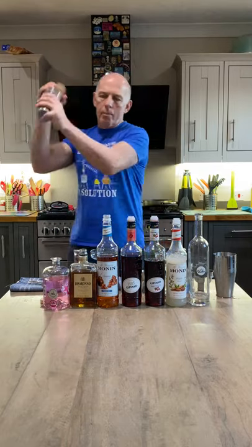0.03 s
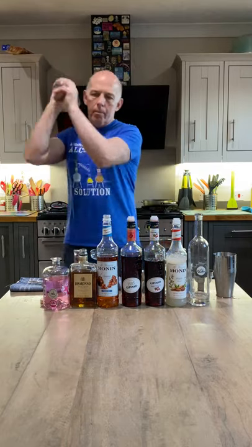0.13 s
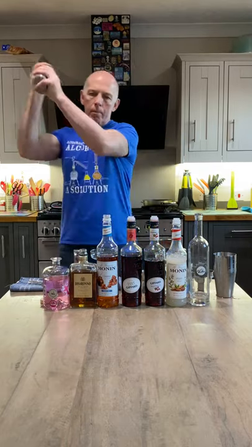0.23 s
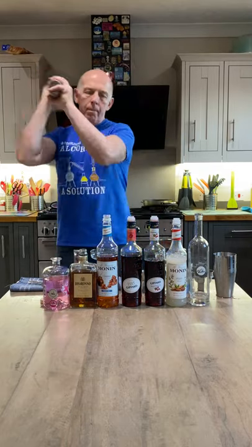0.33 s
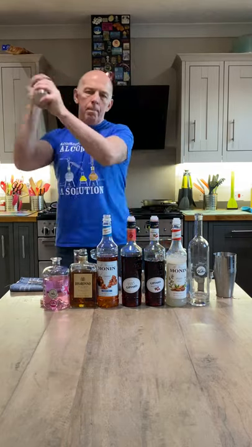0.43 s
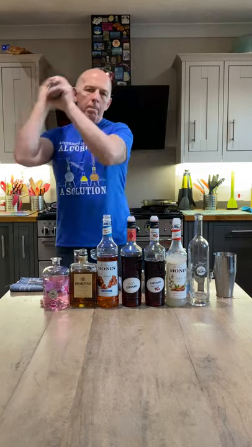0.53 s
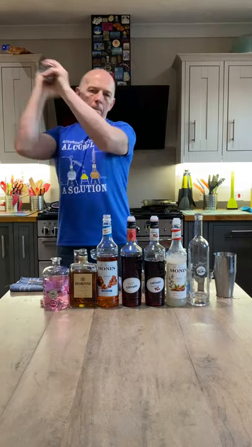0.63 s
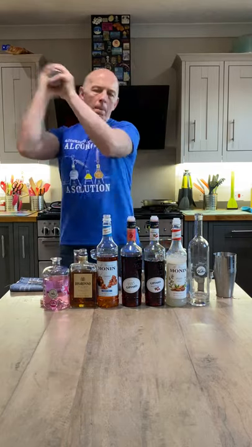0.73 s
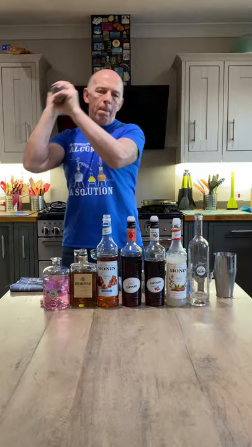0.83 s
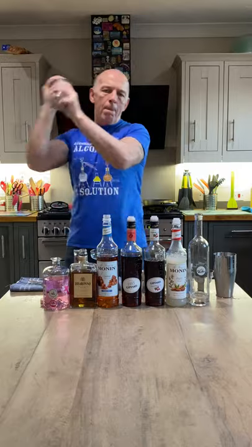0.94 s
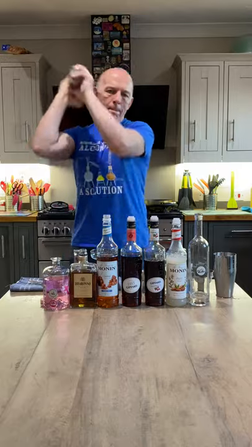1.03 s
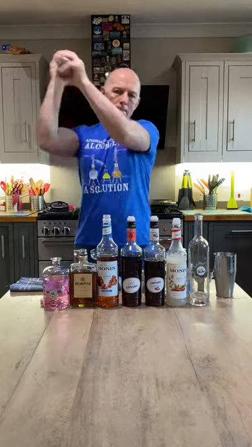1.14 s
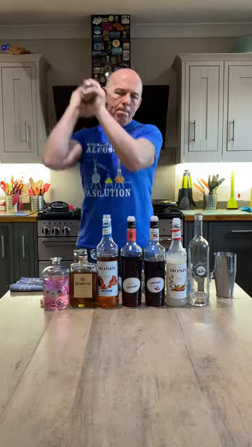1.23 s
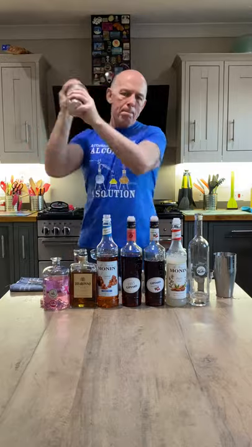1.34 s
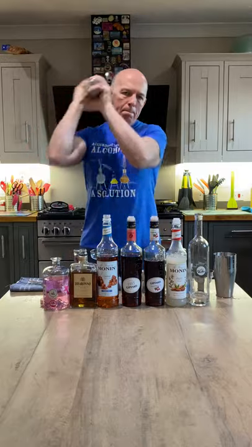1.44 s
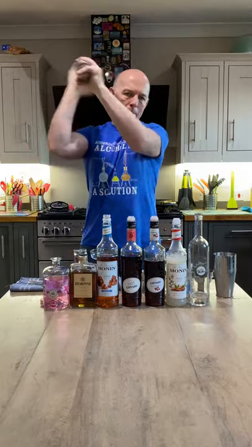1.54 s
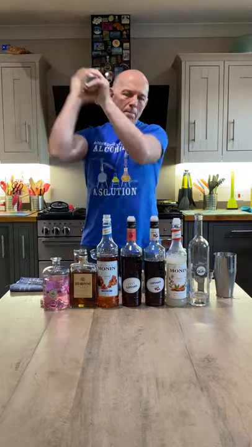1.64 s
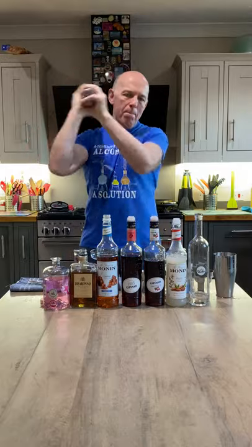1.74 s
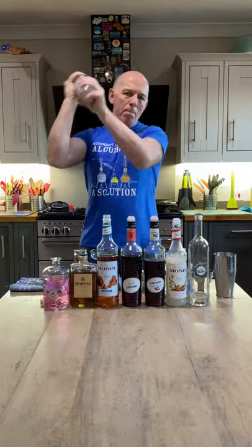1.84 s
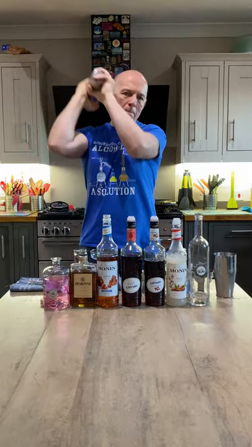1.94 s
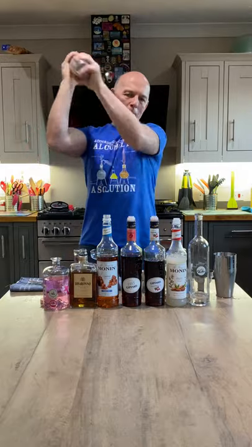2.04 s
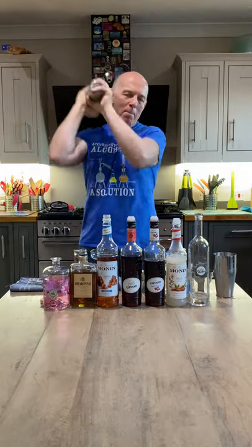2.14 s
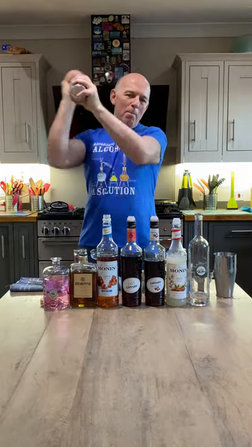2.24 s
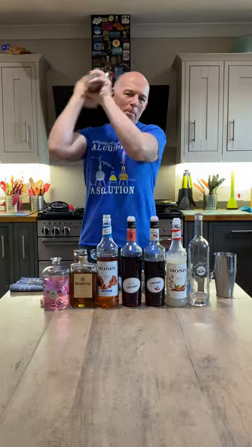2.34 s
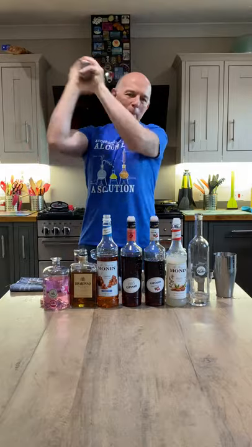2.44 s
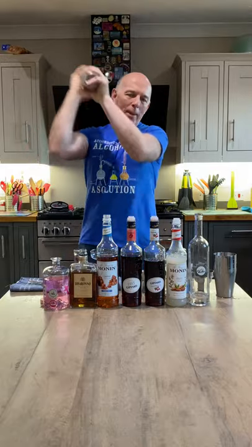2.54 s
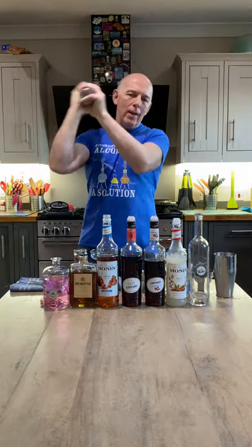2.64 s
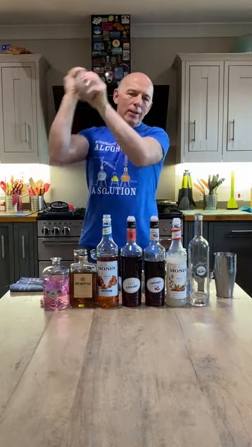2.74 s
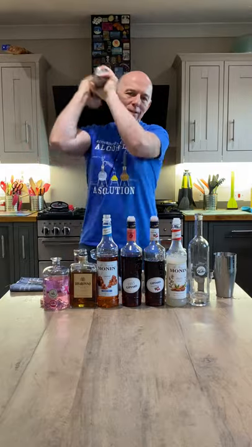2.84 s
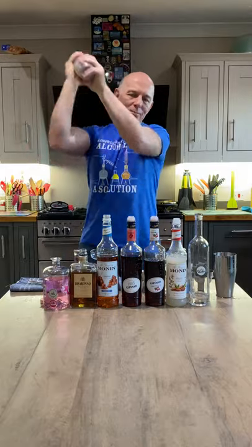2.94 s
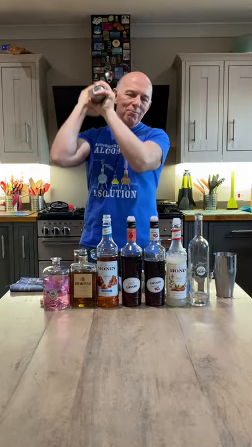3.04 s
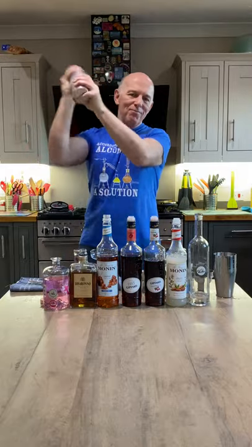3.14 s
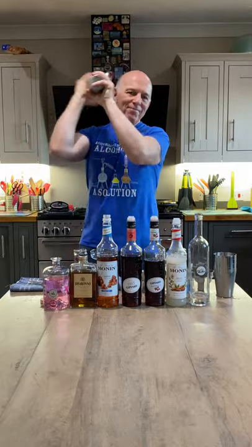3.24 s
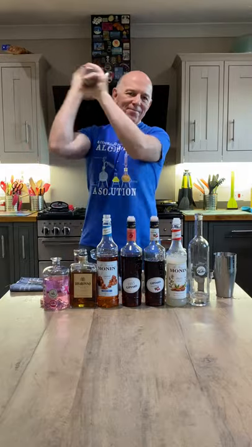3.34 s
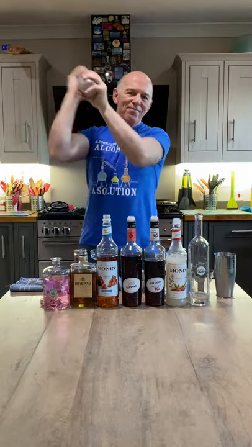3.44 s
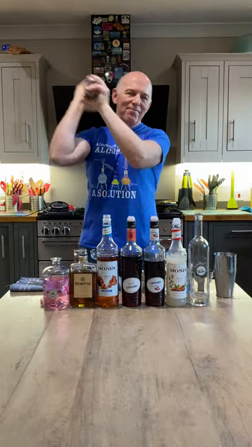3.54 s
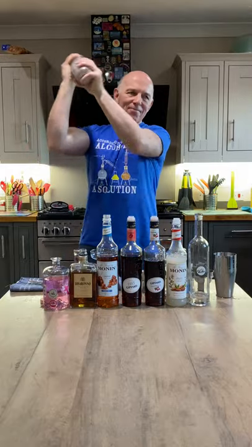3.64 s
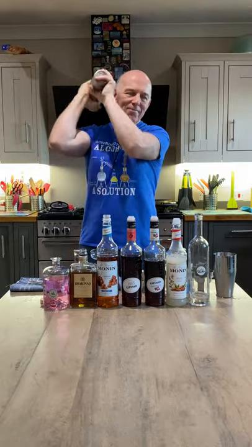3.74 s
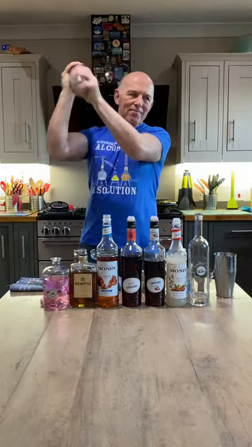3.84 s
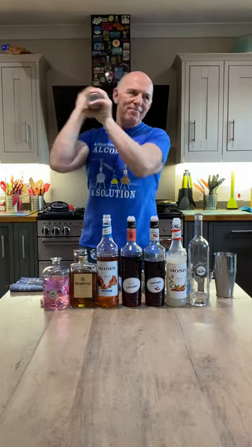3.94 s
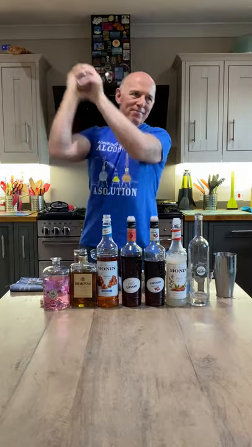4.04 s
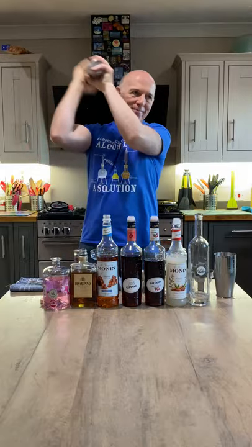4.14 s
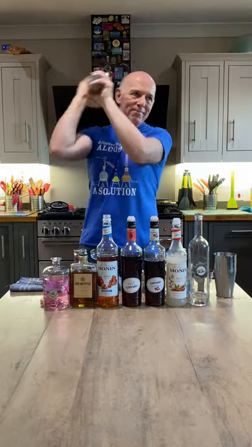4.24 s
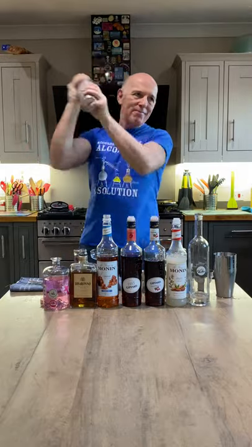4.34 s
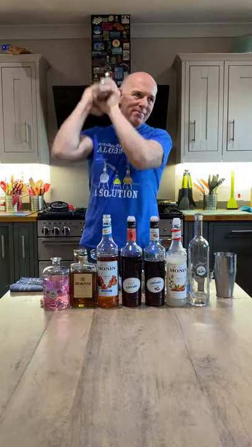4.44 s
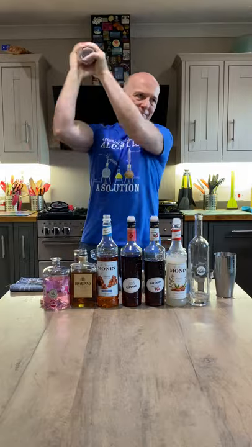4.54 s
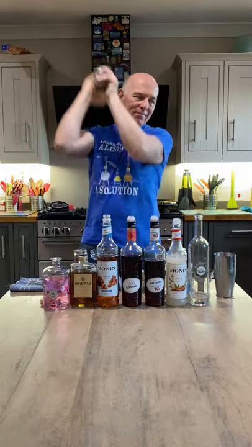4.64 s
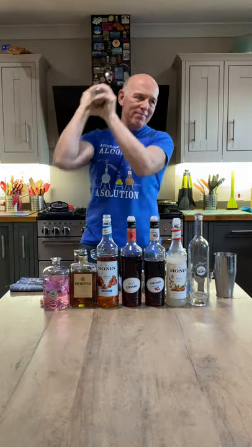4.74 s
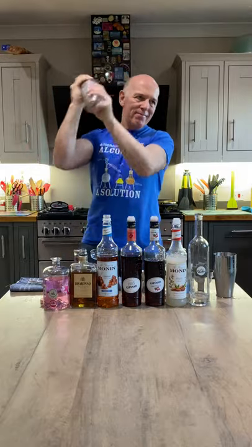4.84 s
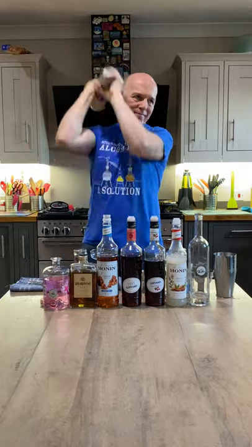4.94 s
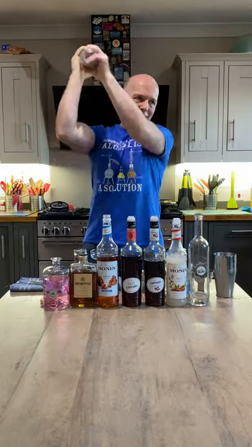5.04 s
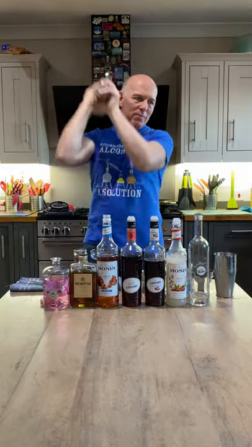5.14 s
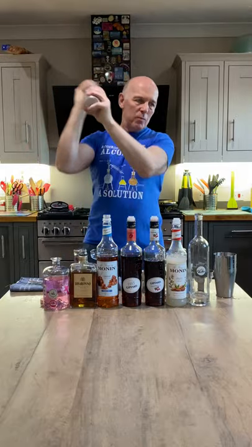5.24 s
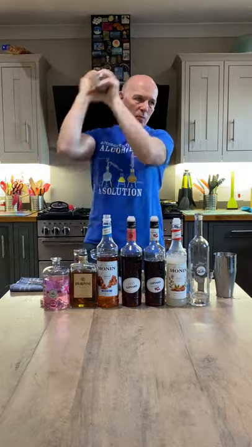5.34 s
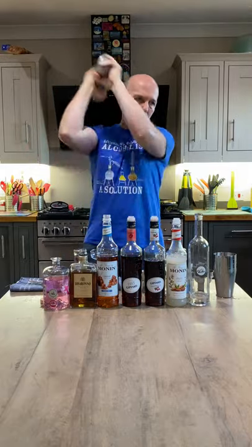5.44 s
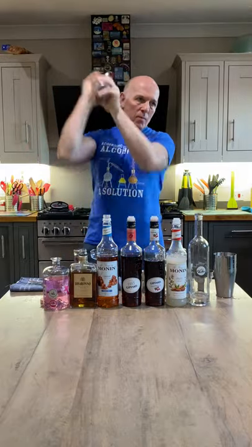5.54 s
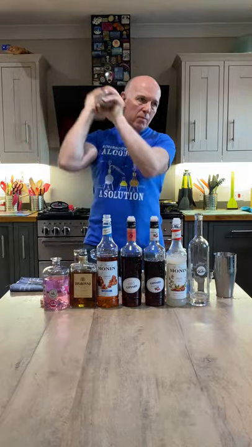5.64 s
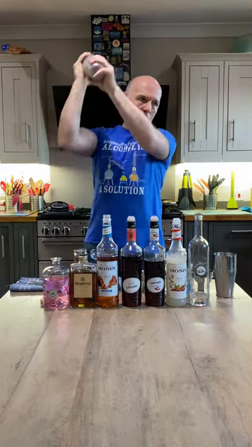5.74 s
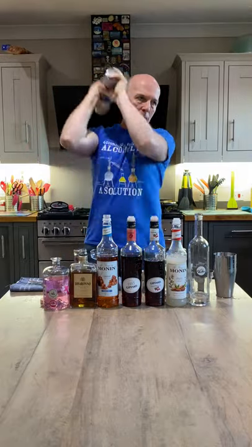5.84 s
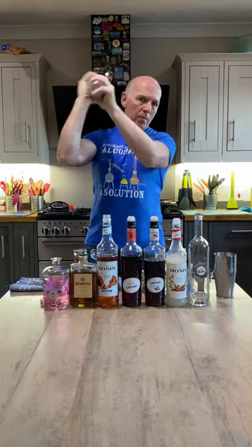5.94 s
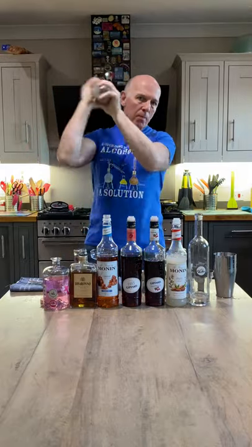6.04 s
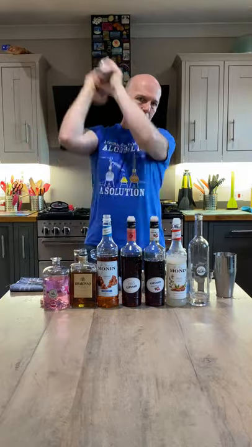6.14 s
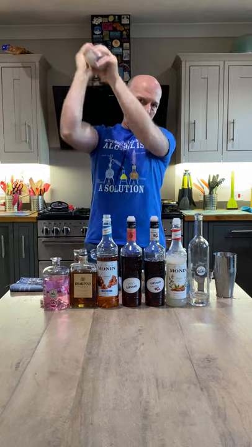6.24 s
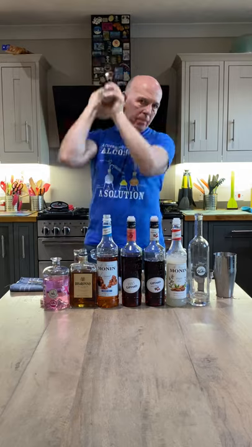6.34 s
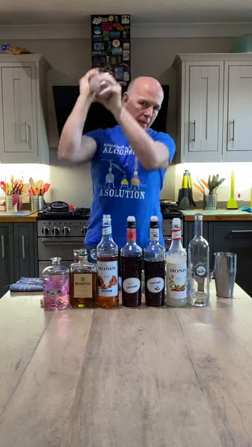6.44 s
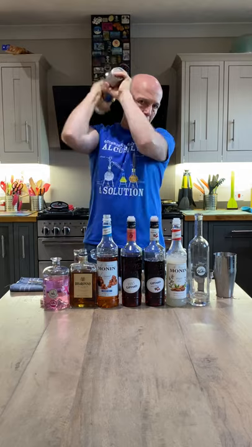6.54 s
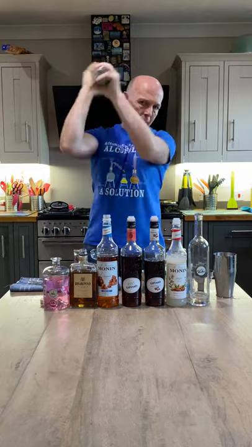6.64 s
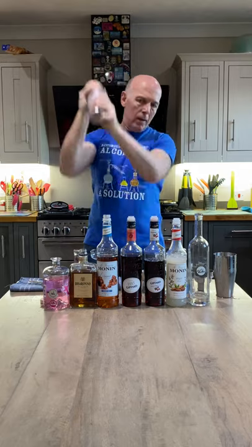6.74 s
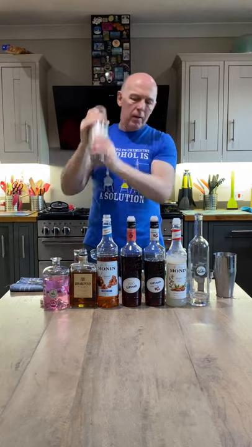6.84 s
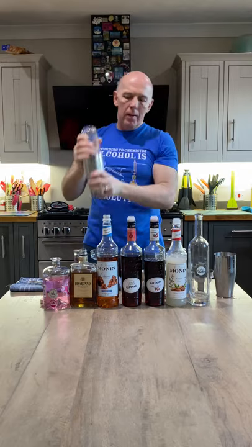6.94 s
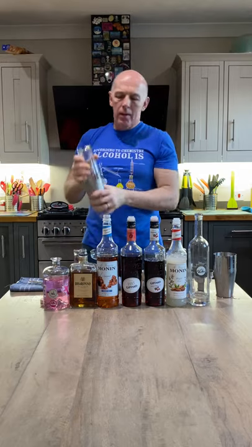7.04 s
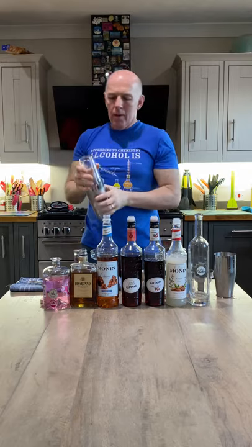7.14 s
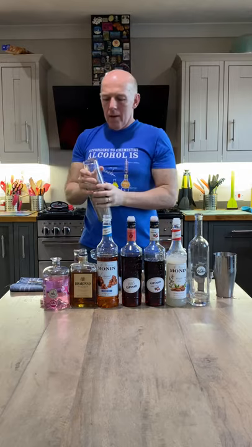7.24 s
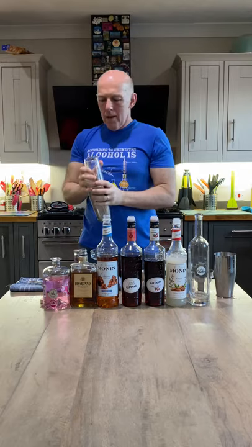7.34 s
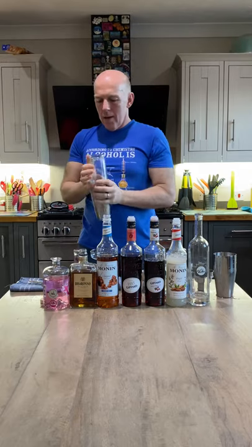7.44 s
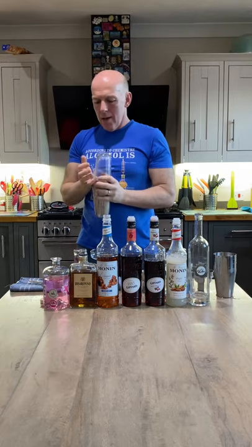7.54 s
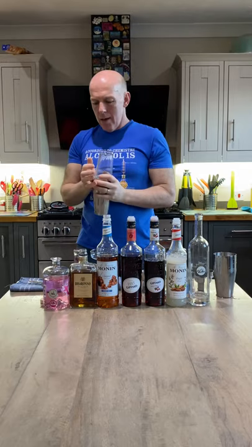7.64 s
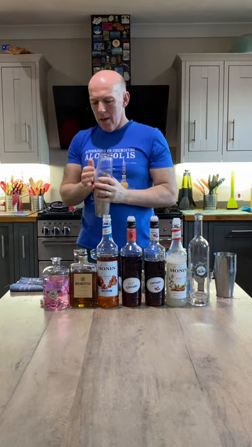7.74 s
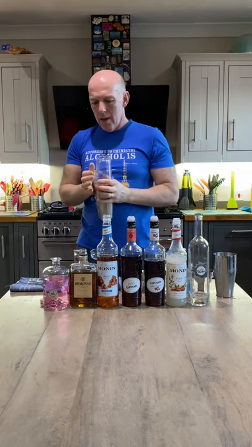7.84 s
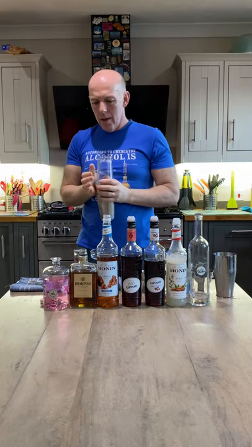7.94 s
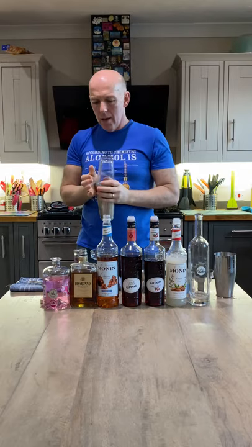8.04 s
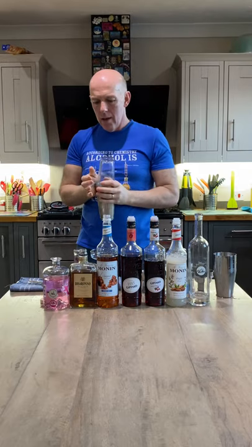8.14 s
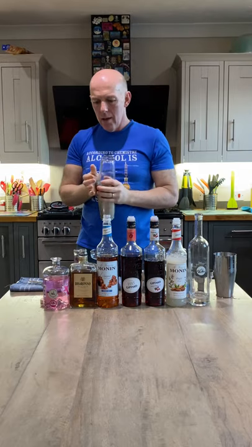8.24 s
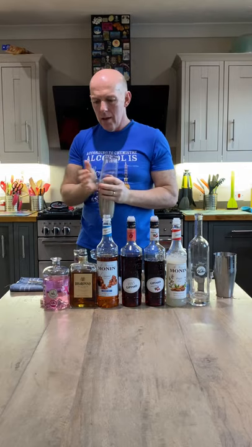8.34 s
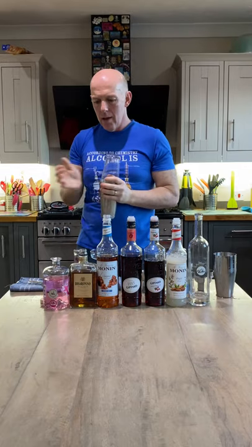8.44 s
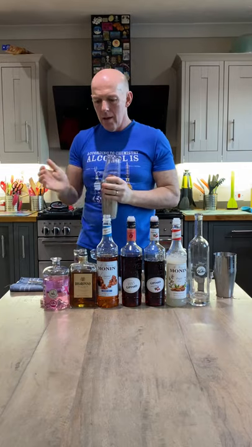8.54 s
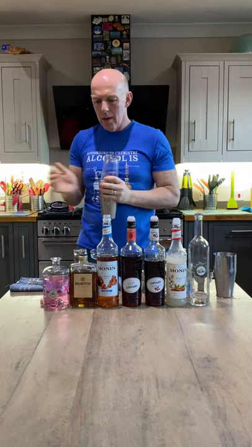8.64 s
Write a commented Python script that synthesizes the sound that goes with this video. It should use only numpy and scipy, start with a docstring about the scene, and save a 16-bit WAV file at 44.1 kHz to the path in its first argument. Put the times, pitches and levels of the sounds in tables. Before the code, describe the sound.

From 0 to about 6.7 seconds a steel cocktail shaker is shaken vigorously in a kitchen. Ice and liquid hit alternate ends roughly nine times a second, slightly uneven in timing and force. Each landing is a short swell of clattering, damped metallic ringing, mostly mid-high, with crisp icy spray above. Harder single cracks, brief singing chatter, dull hollow knocks and low liquid slams stand out irregularly, linked by softer sliding ice. The last weaker clacks fall around 6.8 to 7.1 seconds and the room echo dies away. From 7 to 8.6 seconds there is only a very faint rustle and draining slosh, with small sharp ticks of settling cubes, clearer near 7.5 and 7.9. At about 8.67 a palm slaps the tin with a low, hollow thump, cut off almost immediately. Stereo microphone across the counter, bright but rolled-off top, lively echoes, and faint low hum and rumble that sink after the shaking.

```python
"""In a kitchen, two close microphone ports hear a steel cocktail tin across a counter, with mains hum below.
From the start ice and liquid are thrown from end to end: random contacts ring the modes of wall and ends,
with timed blows, chatter, knocks and slams. Near 7 s the shaking stops: grains through sliding resonances
make a faint rustle and slosh, and the settling ice ticks. At the very end a palm slaps the tin."""
import sys
import numpy as np
from scipy import signal
from scipy.fft import rfft, irfft, next_fast_len
from scipy.io import wavfile

SR = 44100
rng = np.random.default_rng(int(sys.argv[2]) if len(sys.argv) > 2 else 0)


def to_wav(s):
    """Save 16-bit WAV."""
    ch = np.atleast_2d(s).T  # columns
    pcm = np.round(np.clip(ch, -1, 1) * 32767)  # PCM
    wavfile.write(sys.argv[1], SR, pcm.astype(np.int16))


N = 383135

# Source levels are relative: echoes and port colour come after them.
# Ice landing at one end of the tin, about nine times a second: peak_s, low_wall_db,
# then relative to low_wall_db: high_wall_db, chips_db, thud_db
LANDINGS = [(0.045, -27.5, 0, 12.5, 1), (0.208, -33, 2.5, 15, -1), (0.28, -30.5, -3.5, 14, 2.5),
            (0.393, -37.5, 0.5, 17.5, -9), (0.472, -30, -1, 12.5, 2), (0.632, -30.5, 3, 12.5, 1),
            (0.709, -30.5, -3.5, 9.5, 3.5), (0.796, -38, 4.5, 17.5, 4.5), (0.92, -35, 5.5, 17, 9.5),
            (1.048, -32.5, 1, 13, 1), (1.149, -29, -3.5, 9.5, 3), (1.273, -36.5, 7.5, 16, 8.5),
            (1.363, -32.5, 2.5, 16, 9.5), (1.491, -31.5, -2.5, 12, -1), (1.587, -31.5, 3.5, 13, 6.5),
            (1.707, -32.5, 2, 14, -2.5), (1.81, -33, 1, 16, 5), (1.954, -28, -0.5, 9, -7.5),
            (2.046, -34, 1, 15, 4), (2.162, -31, 0, 13, 4), (2.27, -31, 0, 9.5, 3.5),
            (2.398, -32, 1.5, 11.5, 4), (2.498, -31, 0, 12.5, 3.5), (2.613, -35, 0.5, 13.5, 4),
            (2.713, -31.5, -3, 12, 8.5), (2.836, -37.5, 6.5, 18, 8), (2.936, -30, 0.5, 10, 3.5),
            (3.027, -32.5, 1, 11, 1), (3.171, -28, -5, 10, 1), (3.305, -33, 2.5, 12.5, 5),
            (3.42, -31.5, 2.5, 16.5, 5.5), (3.533, -35.5, 1, 11.5, 2), (3.64, -31, 2.5, 14, 4),
            (3.749, -33, -0.5, 12, 5), (3.871, -30, 2.5, 13.5, 3.5), (3.995, -33, 1.5, 11, 5),
            (4.097, -30, -7, 9.5, -1.5), (4.195, -36, 1, 12, 8), (4.319, -29.5, 0.5, 11.5, 4.5),
            (4.452, -34, 3.5, 14, 3.5), (4.563, -32, -0.5, 14, 1), (4.669, -32, -3.5, 11, -1.5),
            (4.798, -33, 0.5, 9, 7.5), (4.881, -34, 2, 14, 8), (5.009, -34.5, 3.5, 18.5, -1),
            (5.146, -32, -6.5, 7.5, 5.5), (5.262, -32.5, 1, 15, 7), (5.385, -31.5, 2.5, 13.5, 1.5),
            (5.502, -30, 0, 12.5, 5.5), (5.639, -33, -3, 10, 0), (5.745, -31, -2, 12, 4),
            (5.85, -38, 6.5, 17, 12), (5.985, -30.5, 0.5, 15.5, 5.5), (6.119, -32.5, -3, 10, -1.5),
            (6.245, -32, 2, 14.5, 7), (6.352, -36, -2, 13, 8), (6.462, -34, 1.5, 12.5, 6.5),
            (6.578, -34.5, 4.5, 14.5, 6), (6.699, -29, -4, 10.5, -2), (6.767, -54.5, 14, -2, 0),
            (6.895, -44.5, 8, 12.5, 9)]
RISE_S, FALL_S, SLIDE_S = 0.0096, 0.026, 0.079   # times of the landing's power; the slide spreads both ways
# Damped wall modes of the gripped tin: mode_hz, level_db, t60_s
WALL_MODES = [(1350, -4, .02), (1660, -2, .015), (1790, 0, .015), (1920, 0, .015), (2080, 0, .018),
              (2250, 0, .016), (2450, -2, .015), (2750, 0, .016), (2920, 0, .016), (3120, -2, .014),
              (3500, 0, .015), (3700, -1, .013), (4000, -2, .012), (4400, -3, .011), (5400, -2, .009),
              (5850, -2, .009), (6800, -3, .008)]
# Low modes of the tin's ends: mode_hz, level_db, t60_s
END_MODES = [(546, 3.5, .04), (624, 5.5, 0.015), (788, 7.5, 0.051), (900, 0, 0.057), (973, 1.5, 0.02),
             (1100, 1.5, 0.049)]
# Single hard blows of a cube on the wall: start_s, level_db, pitch_hz (rings most), crack_db (over level_db)
BLOWS = [(0.034, -15, 5610, -8), (0.1787, -10, 2910, 1.5), (0.2094, -23, 1775, -10.5),
         (0.274, -1, 6780, -10.5), (0.4034, -18, 2920, -3), (0.441, -9, 2700, -6), (0.452, -20, 2900, -9.5),
         (0.4626, -21.5, 2880, -8), (0.61, -14, 3000, -4), (0.633, -12, 1830, -11),
         (0.653, -15.5, 1780, -14), (0.6, -22, 2330, -9.5), (0.703, -0.5, 1876, -6.5),
         (0.7724, -19, 2100, -14), (0.8829, -15, 2810, -4), (0.83, -8, 2880, -8), (0.9114, -6, 5270, -9),
         (1.014, -12.5, 2220, -4), (1.0505, -8, 2730, -7.5), (1.092, -7, 1770, -19),
         (1.137, -5, 3780, -5.5), (1.2511, -28, 1795, -4.5), (1.3317, -16.5, 2810, -15.5),
         (1.3563, -10, 2070, -3.5), (1.576, -7.5, 1746, 1), (1.593, -7.5, 1780, -4.5),
         (1.618, -23, 1910, -4), (1.6561, -7.5, 2440, -5), (1.6906, -8, 2100, -8), (1.8035, -17, 1860, 6.5),
         (1.932, -11, 1900, -2), (1.96, -16.5, 1730, -10.5), (2.0004, -5, 1920, -22.5),
         (2.046, -8, 2200, -13), (2.2144, -7, 2930, -10), (2.2563, -10, 1930, -11.5),
         (2.2682, -5.5, 2320, 5), (2.276, -13, 2400, -11.5), (2.3221, -11.5, 2310, -11.5),
         (2.393, -9, 2750, -8), (2.408, -11.5, 2730, -16), (2.5032, -13.5, 2640, -8.5),
         (2.7072, -14, 2120, -1), (2.7901, -9, 2180, -10), (2.841, -9.5, 1920, -12),
         (2.9301, 7, 1740, -13.5), (2.931, -15, 3650, -19), (2.937, -11, 1840, -14), (2.954, -10, 1940, -4),
         (2.983, -13, 1790, -10.5), (3.021, -14, 2110, -10), (3.1592, -19, 2210, -14),
         (3.364, -17.5, 1860, -11), (3.3924, -4, 3870, -1), (3.4086, -11, 5450, -10.5),
         (3.4417, -8.5, 2280, -14.5), (3.475, -2.5, 2100, -13), (3.626, -21, 2860, 6),
         (3.6406, -17, 3100, -7.5), (3.7638, -11.5, 2750, -10), (3.8467, -12, 2340, 0),
         (3.8801, -15, 2330, -14), (3.9038, -8, 2170, -12), (4.0992, -9.5, 1924, -9),
         (4.1789, -12.5, 1920, -5), (4.2118, -4, 2320, -10), (4.307, -19, 1990, -10),
         (4.3102, 0, 3470, -18), (4.329, 0.5, 3300, -3.5), (4.338, -11.5, 3500, -3.5),
         (4.345, -8, 2030, -19), (4.386, -13, 2300, 2.5), (4.4644, -7, 2520, -13.5),
         (4.5131, -7, 1800, -12.5), (4.557, -13.5, 3670, -15), (4.6034, -16, 3610, -10),
         (4.6423, -12, 2850, 0.5), (4.7745, -12, 2780, -12), (4.7895, -10, 2140, 5), (4.808, -1, 2190, -6),
         (4.833, -20, 2200, -12), (4.873, -6.5, 5400, -15), (4.939, -5.5, 3900, -7.5),
         (4.978, -11, 2000, -11), (5.012, -15, 3740, -12), (5.03, -16.5, 3700, -13), (5.046, -8, 2130, -16),
         (5.1494, -7.5, 2830, -4), (5.2448, -15, 2060, -2.5), (5.3317, -18, 2900, -11.5),
         (5.3453, -11, 2160, -3), (5.3797, -4.5, 2040, -11.5), (5.493, -6, 2010, -11),
         (5.6446, -13.5, 2720, -8.5), (5.7074, -24, 3660, -7.5), (5.7374, -20, 1886, -11.5),
         (5.7528, -9, 1980, -5), (5.8404, -5.5, 2190, -17), (5.9634, -6.5, 2170, 5),
         (5.98, -2.5, 3820, -18), (6.1764, -15.5, 2760, -7), (6.238, -7, 4100, -13.5),
         (6.3294, -4.5, 2190, -15), (6.4656, -7, 1880, -2), (6.537, -2, 3120, -5), (6.5934, -21, 2020, -6),
         (6.6906, -2, 1580, -10.5), (6.8753, -25, 2084, 6), (6.8923, -15, 3420, -3.5),
         (6.9092, -13.5, 3400, -4.5), (6.948, -21.5, 2090, -8), (7.08, -31, 1940, -17),
         (7.105, -36, 2180, -16)]
BOUNCE_S, BOUNCE_DB = 0.018, -13   # the first touch stands clear of its bounces
# A cube chattering on one spot, keeping one mode singing: start_s, length_s, level_db, pitch_hz
CHATTER = [(0.006, 0.045, -37.5, 3130), (0.006, 0.038, -40, 1680), (0.006, 0.097, -34.5, 2910.0),
           (0.026, 0.035, -29, 3790.0), (0.191, 0.036, -36, 3970), (0.196, 0.022, -27, 1810.0),
           (0.232, 0.06, -31, 3070), (0.395, 0.1, -31.5, 2850), (0.623, 0.045, -30.5, 1850),
           (0.694, 0.021, -24.5, 1886), (0.736, 0.047, -29, 2090), (0.849, 0.042, -35, 2740),
           (1.093, 0.09, -33, 1690), (1.126, 0.022, -28, 3680), (1.243, 0.029, -28, 1800),
           (1.323, 0.046, -30.5, 2760), (1.35, 0.046, -34, 2750), (1.446, 0.052, -30, 2030),
           (1.574, 0.024, -24.5, 1810), (1.798, 0.069, -38.5, 1920), (1.926, 0.092, -34.5, 1720),
           (1.99, 0.076, -32.5, 1880), (2.026, 0.028, -30.5, 2800), (2.039, 0.036, -29, 2200.0),
           (2.13, 0.054, -30, 2690), (2.206, 0.075, -41, 2950), (2.254, 0.025, -33.5, 3050),
           (2.261, 0.03, -32, 2350), (2.386, 0.032, -29.5, 2050), (2.393, 0.029, -28, 2780),
           (2.454, 0.046, -31.5, 1710), (2.695, 0.044, -33, 2110.0), (2.848, 0.068, -33, 2070),
           (2.922, 0.012, -20, 3570), (2.922, 0.017, -20.5, 1770), (2.957, 0.045, -39, 1770),
           (3.089, 0.079, -34, 2920), (3.158, 0.036, -34, 2240.0), (3.353, 0.025, -27.5, 1860),
           (3.406, 0.14, -34.5, 2060), (3.531, 0.024, -26, 2880), (3.564, 0.067, -31.5, 1940.0),
           (3.633, 0.041, -29.5, 3890), (3.634, 0.036, -32, 3120), (3.88, 0.052, -28, 2220.0),
           (4.038, 0.03, -28, 2890), (4.094, 0.05, -28, 1930), (4.301, 0.028, -21, 3570),
           (4.311, 0.04, -32, 2870), (4.314, 0.061, -29, 1940), (4.436, 0.1, -36, 1810.0),
           (4.449, 0.034, -30, 2350.0), (4.503, 0.034, -28, 1835), (4.529, 0.077, -31, 1650),
           (4.548, 0.025, -25, 3540), (4.573, 0.047, -29, 3650), (4.793, 0.038, -28, 2150),
           (4.906, 0.04, -29.5, 2050.0), (4.941, 0.12, -33, 3940.0), (4.948, 0.052, -27.5, 1890),
           (4.998, 0.069, -28, 3700), (5.037, 0.024, -25, 2120), (5.237, 0.037, -26.5, 2020),
           (5.336, 0.054, -30, 2930.0), (5.39, 0.034, -28, 1960.0), (5.741, 0.059, -33, 2030),
           (5.958, 0.061, -31, 3800), (5.966, 0.031, -32.5, 1770.0), (5.992, 0.11, -32.5, 2110.0),
           (6.166, 0.027, -27.5, 2800), (6.173, 0.058, -32.5, 1800), (6.526, 0.038, -30, 3110),
           (6.559, 0.024, -27, 4130.0), (6.574, 0.046, -29, 1990), (6.685, 0.052, -25, 1660)]
CHATTER_RISE_S, CHATTER_T60_S = 0.01, 0.03
# Dull knocks of ice on the ends: start_s, level_db, pitch_hz (rings most)
KNOCKS = [(0.042, -25, 1070), (0.275, -38, 940), (0.708, -23, 1100), (0.912, -17.5, 940), (1.017, -36, 931),
          (1.133, -34, 1050), (1.358, -35.5, 929), (1.577, -40, 988), (1.661, -29, 543), (1.808, -16, 870),
          (1.919, -26.5, 620), (2.05, -21.5, 930), (2.16, -32, 525), (2.272, -24.5, 560), (2.71, -21, 940),
          (2.834, -23.5, 549), (2.947, -25.5, 982), (3.174, -21, 900), (3.423, -26, 479), (3.641, -30, 982),
          (3.722, -25.5, 824), (3.889, -35, 896), (4.336, -29, 880), (4.43, -20, 607), (4.668, -22, 602),
          (4.798, -23.5, 930), (5.28, -18, 519), (5.353, -29, 620), (5.99, -23.5, 887), (6.234, -30, 767),
          (6.355, -29, 610), (6.475, -17, 940), (6.571, -28, 820), (6.698, -26.5, 920)]
# Liquid slamming an end and pushing the air: start_s, level_db (before make-up gain), pitch_hz
SLAMS = [(0.034, -38, 377), (0.159, -34, 161), (0.914, -32.5, 172), (1.132, -44, 221), (1.485, -37.5, 304),
         (1.576, -31.5, 299), (1.702, -44, 320), (1.806, -24, 361), (1.901, -39, 318), (2.267, -42, 354),
         (2.707, -33.5, 380), (2.81, -46, 350), (2.93, -35.5, 299), (3.163, -41, 365), (3.602, -43, 223),
         (3.713, -44, 293), (3.873, -40.5, 382), (4.315, -36, 342), (4.793, -40.5, 310), (5.048, -38, 293),
         (5.151, -44, 301), (5.252, -37.5, 380), (5.473, -42, 328), (5.74, -43, 336), (5.83, -42, 323),
         (5.986, -39, 383), (6.114, -38, 312), (6.25, -33.5, 350), (6.517, -45, 350), (6.69, -34, 355)]
SLAM_T60_S, SLAM_CONTACT_HZ = 0.025, 300
# Ice settling in the still tin: time_s, rustle_db, resonance_hz
SETTLE = [(7.0, -49, 1902), (7.09, -49, 1850), (7.13, -64, 1910), (7.25, -58, 1900), (7.36, -60.5, 1950),
          (7.45, -65, 2010), (7.475, -57, 2097), (7.53, -57, 1960), (7.635, -60, 2040), (7.655, -61, 2000),
          (7.69, -63, 2200), (7.75, -56, 2364), (7.9, -65, 2266), (8.1, -61.5, 2137), (8.23, -77, 2016),
          (8.27, -59, 1500), (8.35, -65, 1543), (8.37, -60.5, 1900), (8.44, -59, 1545), (8.5, -62, 1550),
          (8.52, -54, 1600), (8.57, -58, 1500), (8.59, -62, 1600), (8.69, -59, 1850)]
# Liquid running down: time_s, slosh_db, resonance_hz
DRAIN = [(7.0, -46.5, 790), (7.08, -54, 710), (7.11, -46, 715), (7.14, -54, 740), (7.25, -59, 750),
         (7.33, -62, 900), (7.42, -63, 1000), (7.47, -64, 880), (7.51, -54.5, 800), (7.58, -74, 900),
         (7.85, -61, 1000), (7.97, -62, 950), (8.2, -76, 904), (8.3, -58, 852), (8.38, -66, 900),
         (8.46, -61, 900), (8.56, -72, 950), (8.69, -78, 900)]
# Ticks of settling cubes: start_s, low_db, bright_db, bright_hz
TICKS = [(7.355, -50, -42, 3300), (7.4016, -55, -56, 3500), (7.459, -56, -48, 4500),
         (7.4744, -47, -46, 3700), (7.5044, -35, -50, 3500), (7.5897, -46, -39, 3300),
         (7.6174, -44, -40, 3500), (7.735, -50, -40, 4000), (7.7518, -54, -40, 4200),
         (7.8094, -58, -42, 3900), (7.849, -55, -56, 3300), (7.9226, -43, -34.5, 4100),
         (8.036, -59, -44, 3980), (8.0666, -50, -52, 2900), (8.2474, -62, -44, 3780),
         (8.257, -60, -50, 3200), (8.3664, -43, -55, 2200), (8.414, -49, -58, 2200),
         (8.5122, -48, -35, 4170), (8.5264, -46, -40, 3700), (8.613, -56, -51, 3500)]
# Contacts of the palm on the tin: start_s, crack_db, thump_db, thump_hz, ends_db
SLAP = [(8.668, -20, -36, 300, -45), (8.673, -26, 1, 285, -24.5)]
# Echoes of the kitchen: frequency_hz, t60_s, strength_db
KITCHEN = [(100, 0.42, -10), (497, 0.76, 11.5), (1500, 1, 1.5), (4100, 0.61, -0.5), (12100, 0.72, -4.5)]
KITCHEN_DB = -3.5
# Colour of the sum of the two ports: frequency_hz, gain_db
SUM_COLOUR = [(35, -50), (60, -22.5), (75, -19.5), (163, -13.5), (265, -18), (540, -9.5), (720, -10),
              (900, -7.5), (1070, -8), (1800, -3), (2550, -4), (3640, -4), (5790, -5), (10300, -12.5),
              (12500, -15)]
# Colour of the difference of the two ports: frequency_hz, gain_db (before DIFFERENCE_DB)
DIFFERENCE_COLOUR = [(59, -63), (100, -32), (267, -30), (497, -18.5), (743, -12), (1350, -8.5), (1660, -17),
                     (2790, 0), (3410, -8), (4790, -2), (5400, -9.5), (6740, -6), (9860, -3), (12000, -8),
                     (16000, -2.5)]
# Phase of the difference ahead of the sum: frequency_hz, lead_radians
LEAD = [(125, 1.9), (250, 2.4), (500, 3), (1000, 1.55), (2000, 1.72), (4000, 1.57)]
DIFFERENCE_DB, ECHO_APART_DB = -5.5, 3   # echoes differ more between the ports than the direct sound
NOTCH_HZ, NOTCH_WIDTH_HZ, NOTCH_DEPTH = 4800, 263, 0.72   # the ports partly cancel each other here
SUM_TOP_HZ = 11340   # the sum is all but empty above this
# Hum and low rumble, sinking as the shaking stops: time_s, hum_db, rumble_db
HUM = [(0.0, -65, -61), (6.85, -62.5, -63.5), (7.3, -64, -71), (7.5, -72, -70.5), (7.9, -75, -73),
       (8.69, -73, -76)]
HUM_HZ = 48
CUTOFF_HZ = 15750


def from_db(db):
    """dB to gain."""
    return 10 ** (np.asarray(db) / 20)


def rms_one(x):
    """Scale to rms 1."""
    return x / np.sqrt(np.mean(x ** 2) + 1e-20)


def in_time(rows):
    """Each column of a curve at every sample."""
    s, *columns = np.transpose(rows)
    return [np.interp(np.arange(N) / SR, s, column) for column in columns]


def at_hz(points, hz, axis=1):
    """A column of a spectrum read on a log-frequency axis."""
    return np.interp(np.log(hz), np.log(np.array(points)[:, 0]), np.array(points)[:, axis])


def wander(steps_per_s, count):
    """Random values at a steady rate, joined by straight lines."""
    return np.interp(np.arange(N) / SR * steps_per_s, np.arange(count), rng.standard_normal(count))


def band(x, low_hz, high_hz):
    """Band-pass."""
    return signal.sosfilt(signal.butter(2, [low_hz, high_hz], "band", fs=SR, output="sos"), x)


def ring(clicks, hz, t60):
    """A damped resonator: a unit click sets a dying sine of starting height 1."""
    r, w = from_db(-60 / (t60 * SR)), 2 * np.pi * hz / SR
    return signal.lfilter([0, np.sin(w)], [1, -2 * r * np.cos(w), r * r], clicks + 1e-18)


def contacts(per_s, spread_db):
    """Random clicks of either sign, most of them small, a few large."""
    sizes = from_db(spread_db * np.minimum(rng.exponential(1, N), 5))
    signs = rng.choice([-1, 1], N)
    return sizes * signs * (rng.random(N) < per_s / SR)


def dealt_to(clicks, modes, patchy_db, changes_per_s):
    """Every click finds one mode to ring; which modes are favoured shifts as the ice moves; rms 1."""
    dealt = rng.integers(0, len(modes), N)
    out = np.zeros(N)
    for k, (hz, db, t60) in enumerate(modes):
        favour = from_db(patchy_db * wander(changes_per_s, 400))
        # dividing by sqrt(t60) keeps long modes from outweighing short ones
        out += from_db(db) / np.sqrt(t60) * ring(clicks * (dealt == k) * favour, hz, t60)
    return rms_one(out)


def bursts(times, levels_db, bands_hz, decay_s):
    """A click and a short dying puff of band noise, scaled to its peak level."""
    out, t = np.zeros(N + SR), np.arange(SR // 10) / SR
    noise = rng.standard_normal((len(times), len(t))) * np.exp(-t / decay_s)
    noise[:, 0] = 4.7   # the first contact is the hardest
    for s, db, (low_hz, high_hz), puff in zip(times, levels_db, bands_hz, noise):
        puff = band(puff, low_hz, high_hz)
        out[round(s * SR):][:len(t)] += from_db(db) * puff / np.max(np.abs(puff))
    return out[:N]


def shake():
    """Cubes ring the wall, chips of ice spit in the treble, the liquid thuds against the ends."""
    _, low_db, high_db, chips_db, thud_db = np.transpose(LANDINGS)
    low_wall = wall(WALL_MODES[:7], 1045, 2830, scuff_db=-1.0)
    high_wall = wall(WALL_MODES[7:14], 2200, 5400, scuff_db=3.5)
    chip_modes = [(hz, 0, 11.3 / hz) for hz in np.geomspace(4800, 16500, 12)]
    chips = dealt_to(contacts(per_s=7000, spread_db=0.5), chip_modes, patchy_db=3.5, changes_per_s=18)
    thud = rms_one(band(contacts(per_s=1500, spread_db=3.5), 110, 1480))
    ends = dealt_to(contacts(per_s=180, spread_db=3.5), END_MODES, patchy_db=2.0, changes_per_s=9)
    thud = thud + from_db(-11) * ends
    return (landings(low_db, slide_db=-3.0) * low_wall
            + landings(low_db + high_db, slide_db=-3.5) * high_wall
            + landings(low_db + chips_db, slide_db=-7.0) * chips
            + landings(low_db + thud_db, slide_db=-24.0) * thud)


def wall(modes, low_hz, high_hz, scuff_db):
    """Cubes ring the wall modes, now these and now those, and scuff the steel between them."""
    rung = dealt_to(contacts(per_s=700, spread_db=3.0), modes, patchy_db=2.0, changes_per_s=25)
    scuff = rms_one(band(contacts(per_s=1200, spread_db=1.5), low_hz, high_hz))
    return rung + from_db(scuff_db) * scuff


def landings(levels_db, slide_db):
    """Gain in time: every landing swells and dies on a broader, softer slide; powers add."""
    t = np.arange(0, N, 64) / SR
    late = t - np.array(LANDINGS)[:, :1]
    swell = np.exp(np.minimum(late / RISE_S, -late / FALL_S))
    slide = np.exp(-(late / SLIDE_S) ** 2)
    power = from_db(2 * levels_db) @ (swell + from_db(2 * slide_db) * slide)
    return np.interp(np.arange(N) / SR, t, np.sqrt(power))


def blows(reach_octaves, crack_s, mode_share_db):
    """A blow cracks, bounces for a moment and rings the wall modes near its pitch, each with its own strength."""
    s, db, pitch, crack_db = np.transpose(BLOWS)
    at, out = np.round(s * SR).astype(int), np.zeros(N)
    octaves_off = np.log2(np.array(WALL_MODES)[:, 0] / pitch[:, None])
    near = np.exp(-(octaves_off / reach_octaves) ** 2) + 0.039   # far modes still ring a little
    strengths = from_db(db + mode_share_db)[:, None] * near * from_db(rng.normal(0, 0.37, near.shape))
    bounces = from_db(BOUNCE_DB) * contacts(per_s=970, spread_db=3.0)
    for k, ((hz, mode_db, t60), strength) in enumerate(zip(WALL_MODES, strengths.T)):
        clicks = np.zeros(N)
        clicks[at] = from_db(mode_db) * strength
        dying = signal.lfilter([1], [1, -np.exp(-1 / (BOUNCE_S * SR))], clicks + 1e-18)
        # the shift gives each mode bounces at other moments
        out += ring(clicks + dying * np.roll(bounces, 997 * k), hz, t60)
    return out + bursts(s, db + crack_db, [(1000, 11700)] * len(s), crack_s)


def chatter():
    """Dense uneven touches swell in, last the length of the run and leave the mode to die."""
    out, t = np.zeros(N + SR), np.arange(SR // 5) / SR
    for s, length, db, hz in CHATTER:
        touches = rng.standard_normal(len(t)) * (rng.random(len(t)) < 1000 / SR)
        swell = np.clip(t / CHATTER_RISE_S, 0, 1) ** 2
        run = swell * (t < length) * np.exp(-0.35 * t / length)
        sure_touch = 2.2 * (t == t[SR // 120])   # every run has at least this one
        rung = ring(touches * run + sure_touch, hz, CHATTER_T60_S)
        out[round(s * SR):][:len(t)] += from_db(db) * rung / np.sqrt(np.sum(rung ** 2) / (length * SR))
    return out[:N]


def knocks(reach_octaves, gain_db):
    """A knock rings the low modes of the ends, most of all those near its pitch."""
    s, db, pitch = np.transpose(KNOCKS)
    out = np.zeros(N)
    for hz, mode_db, t60 in END_MODES:
        near = np.exp(-(np.log2(hz / pitch) / reach_octaves) ** 2) + 0.11
        clicks = np.zeros(N)
        clicks[np.round(s * SR).astype(int)] = from_db(db + mode_db + gain_db) * near
        out += ring(clicks, hz, t60)
    return out


def slams():
    """The liquid's soft contact, a low-pass, sets a low, short thump."""
    out, t = np.zeros(N + SR), np.arange(SR // 5) / SR
    soften = signal.butter(2, SLAM_CONTACT_HZ, fs=SR, output="sos")
    for s, db, hz in SLAMS:
        thump = signal.sosfilt(soften, ring(t == 0, hz, SLAM_T60_S))
        out[round(s * SR):][:len(t)] += from_db(db + 13.5) * thump   # make-up gain in dB
    return out[:N]


def settle():
    """A faint rustle through a resonance that slides as the tin is tilted, over a hollow slosh."""
    still = np.arange(N) >= SETTLE[0][0] * SR
    rustle = sliding(SETTLE, width_hz=460, spread_db=4.5)
    bright = from_db(in_time(SETTLE)[0]) * rms_one(band(contacts(per_s=2800, spread_db=2.5), 860, 4460))
    slosh = sliding(DRAIN, width_hz=610, spread_db=3.0)
    return still * (rustle + bright + slosh)


def sliding(rows, width_hz, spread_db):
    """Grains through a resonance whose level and centre follow the rows."""
    level_db, hz = in_time(rows)
    pole = np.exp(-np.pi * width_hz / SR)
    grains = [contacts(2500, spread_db), contacts(2500, spread_db)]
    slow = signal.lfilter([1], [1, -2 * pole, pole ** 2], grains)
    # two low-passed streams on a moving carrier make a band around it
    phase = 2 * np.pi * np.cumsum(hz) / SR
    return from_db(level_db) * rms_one(slow[0] * np.cos(phase) + slow[1] * np.sin(phase))


def ticks():
    """A settling cube gives a dull knock around the rustle's resonance and a crisp bright edge."""
    s, low_db, bright_db, bright_hz = np.transpose(TICKS)
    hz = in_time(SETTLE)[1][(s * SR).astype(int)]
    knock = bursts(s, low_db, hz[:, None] * [.85, 1.18], decay_s=0.0049)
    return knock + bursts(s, bright_db, bright_hz[:, None] * [.72, 1.3], decay_s=0.0023)


def slap():
    """Skin cracks on steel as dying noise, while the tin thumps and two modes of its ends ring."""
    out, t = np.zeros(N + SR), np.arange(SR // 8) / SR
    for s, crack_db, thump_db, hz, ends_db in SLAP:
        crack = from_db(crack_db) * band(rng.standard_normal(len(t)), 1300, 5900) * np.exp(-t / 0.017)
        swell = t / 0.00173 * np.exp(-t / 0.00173)
        thump = from_db(thump_db) * np.sin(2 * np.pi * hz * t) * swell
        ends = from_db(ends_db) * sum(ring(t == 0, mode_hz, t60) for mode_hz, _, t60 in END_MODES[2::3])
        out[round(s * SR):][:len(t)] += crack + thump + ends
    return out[:N]


def ports(x, diffuse, swing_per_s):
    """Sum and difference of the two ports; the difference leads by a quarter to half a cycle."""
    size = next_fast_len(N + SR)
    hz = np.maximum(np.arange(size // 2 + 1) * SR / size, 1)
    # the tin swings through four places, each with echoes of its own
    turn = np.pi * (swing_per_s * np.arange(N) / SR + np.arange(4)[:, None] / 4)
    places = rfft(x * np.cos(turn) ** 2 / 2, size)
    tails = from_db(KITCHEN_DB) * rfft(kitchen(count=8), size).reshape(2, 4, -1)
    direct = rfft(x, size)
    tail, other = np.sum(places * tails, axis=1)

    notch = 1 - NOTCH_DEPTH / (1 + ((hz - NOTCH_HZ) / NOTCH_WIDTH_HZ) ** 2)
    top = from_db(-51.0) + 1 / (1 + (hz / SUM_TOP_HZ) ** 40)
    both = (direct + tail) * notch * top * from_db(at_hz(SUM_COLOUR, hz))

    lead = np.exp(1j * at_hz(LEAD, hz))
    # the diffuse share of the difference has echoes unrelated to those of the sum
    echoes = np.sqrt(1 - diffuse) * lead * tail + np.sqrt(diffuse) * other
    apart = lead * direct + from_db(ECHO_APART_DB) * echoes
    apart = apart * from_db(at_hz(DIFFERENCE_COLOUR, hz) + DIFFERENCE_DB)

    both, apart = irfft(both, size)[:N], irfft(apart, size)[:N]
    return np.array([both + apart, both - apart])


def kitchen(count):
    """Unrelated tails of echoes, each octave dying at its own rate; energy 1."""
    t = np.arange(SR) / SR
    tails = np.zeros((count, SR))
    for low in 60 * 2 ** np.arange(0, 8.5):
        noise = band(rng.standard_normal((count, SR)), low, min(2 * low, 19000))
        # strength is read inside the octave, decay time about an octave above it
        t60, strength_db = at_hz(KITCHEN, 4.2 * low), at_hz(KITCHEN, 1.73 * low, axis=2)
        tails += noise * from_db(-60 * t / t60 + strength_db)
    tails = tails * np.clip((t - .004) / 0.00027, 0, 1)   # first walls answer after 4 ms
    return tails / np.linalg.norm(tails, axis=1, keepdims=True)


def hum():
    """Mains hum, steady in pitch and wavering in level, on a low rumble of patchy noise."""
    hum_db, rumble_db = in_time(HUM)
    waver_db, patches_db = 1.6 * wander(5, 60), 2.2 * wander(12, 120)
    tone = np.sqrt(2) * np.sin(2 * np.pi * HUM_HZ * np.arange(N) / SR)
    rumble = rms_one(band(band(rng.standard_normal(N), 55, 180), 50, 400))
    return from_db(hum_db + waver_db) * tone + from_db(rumble_db + patches_db) * rumble


def scene():
    """Everything in the tin passes through room and ports; the hum is added alike to both."""
    hard = blows(reach_octaves=0.053, crack_s=0.022, mode_share_db=-8)
    shaken = shake() + hard + chatter() + knocks(reach_octaves=0.063, gain_db=3.5) + slams()
    tin = shaken + settle() + ticks() + slap()
    return ports(tin, diffuse=0.93, swing_per_s=2.2) + hum()


def record(dry):
    """A steep low-pass cuts the top."""
    return signal.sosfilt(signal.ellip(12, .5, 75, CUTOFF_HZ, fs=SR, output="sos"), dry)


dry = scene()
out = record(dry)
to_wav(out)
```